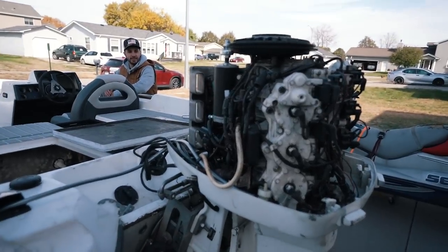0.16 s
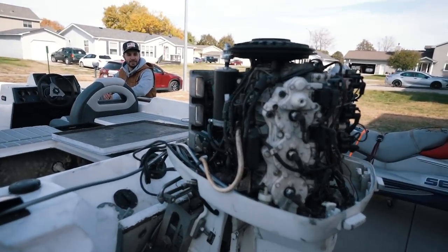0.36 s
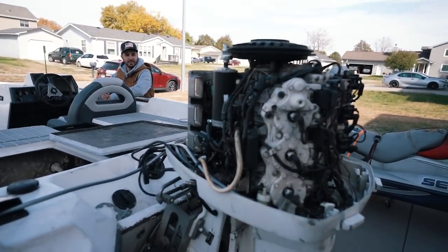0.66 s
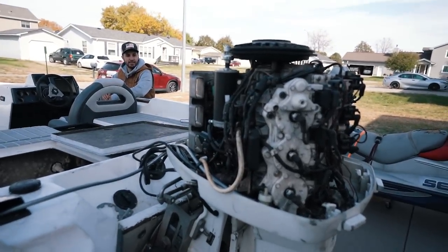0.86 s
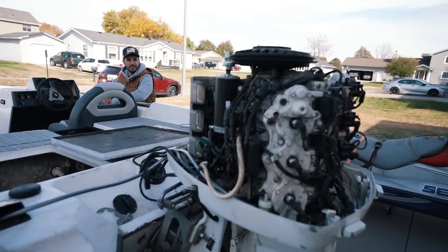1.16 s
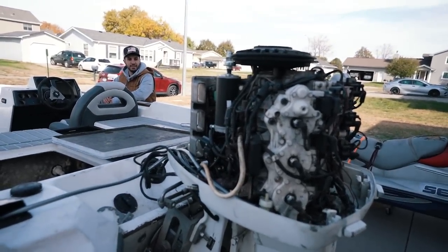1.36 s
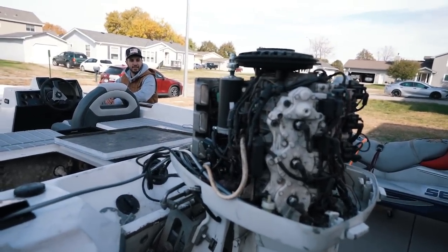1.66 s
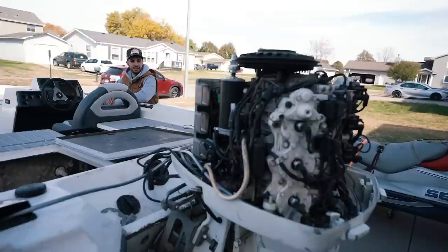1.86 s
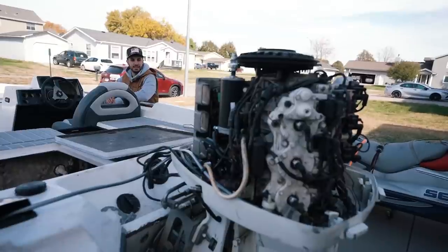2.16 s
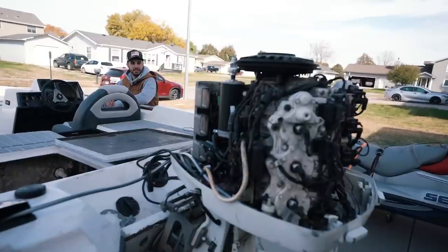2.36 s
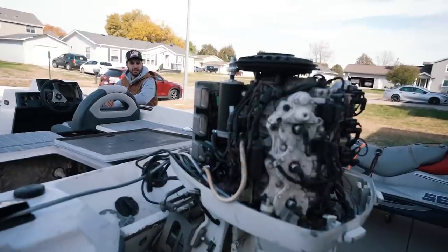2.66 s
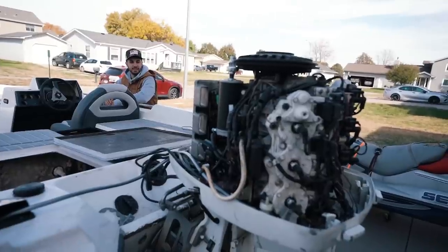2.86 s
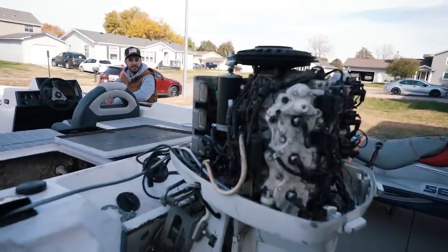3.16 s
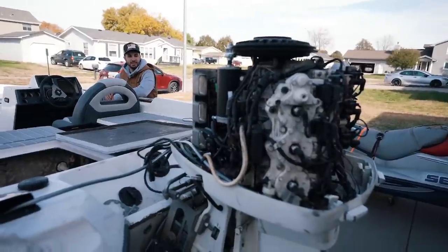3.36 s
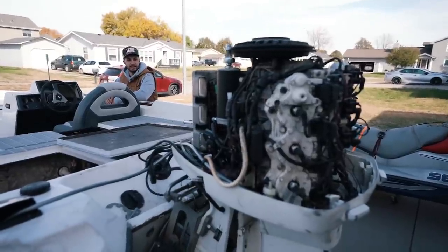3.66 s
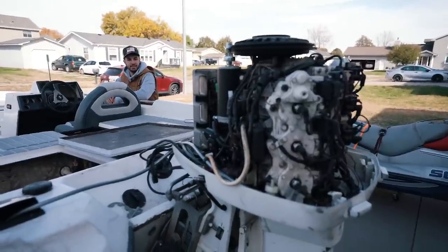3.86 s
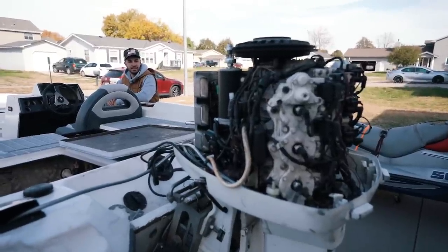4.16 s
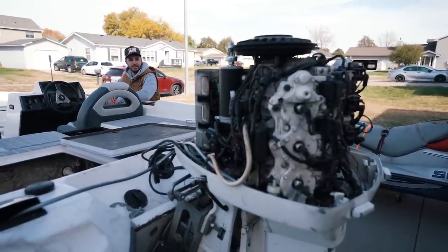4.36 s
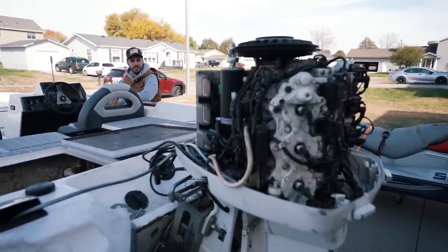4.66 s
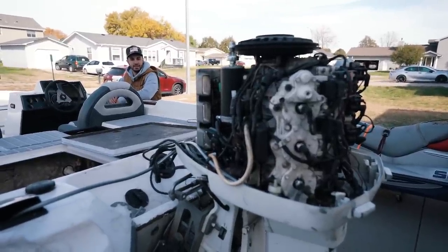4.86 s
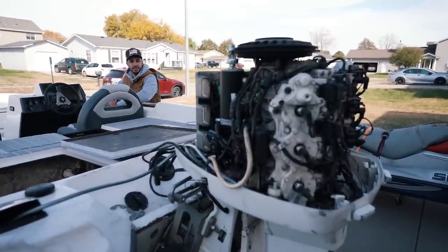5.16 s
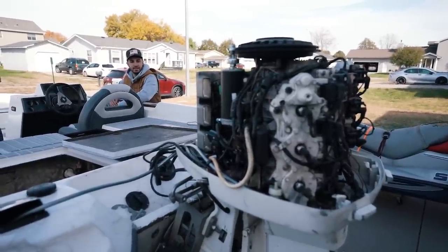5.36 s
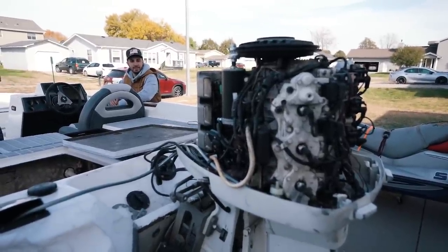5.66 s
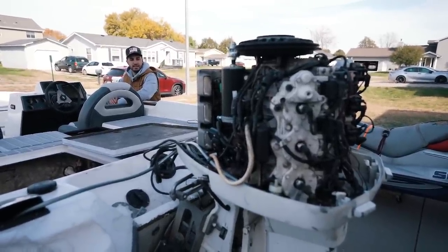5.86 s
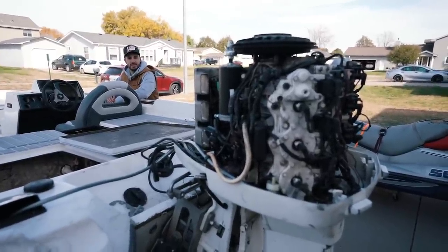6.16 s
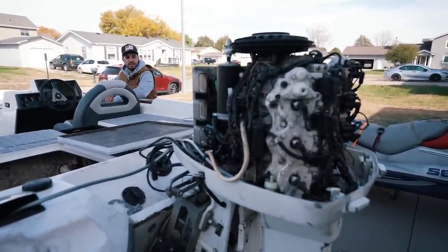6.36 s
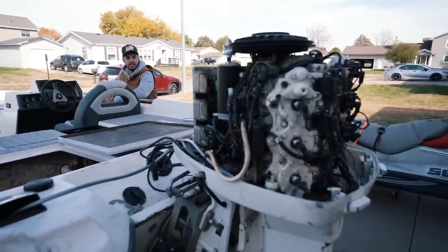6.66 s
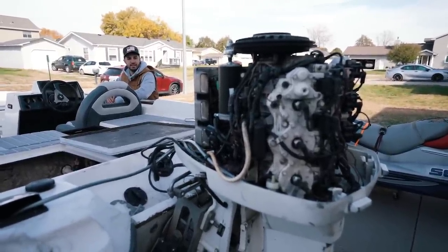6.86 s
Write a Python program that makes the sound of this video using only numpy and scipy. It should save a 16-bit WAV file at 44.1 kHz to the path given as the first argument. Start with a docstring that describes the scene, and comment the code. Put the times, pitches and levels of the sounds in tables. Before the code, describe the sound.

From the start, an electric starter cranks an uncovered two-stroke outboard engine, close by and outdoors. It quickly settles at about eight knocking compressions a second, with rattling gear teeth, a wavering whine, low booms, pulses of hiss and tiny, very high squeaks. The metal rings slightly and the open boat adds short reflections. At about 3.6 seconds the starter drops out with two clacks, and the engine coasts to rest by 4 seconds with a faint chirp. The much quieter pause holds a light patter of drops and a little low wind, with a dull bump on a hull panel at 4.6 seconds and a fainter one near 5.6. Right afterwards the starter engages with a loud metallic clack and a grind of gears. The rhythmic cranking is back by 6 seconds and continues to the end at about 7 seconds. The engine never catches.

```python
"""A starter cranks an uncowled three-cylinder two-stroke outboard in two runs; it never catches.
Ring-gear teeth rattle through the block over the starter's whine and the booms of the crankcases.
At each compression the gears slow, air hisses past the rings and the slack knocks over, ringing the
flywheel. Solenoid and pinion clack out and back in, and the open hull adds short reflections.
The pause holds a bump on a hull panel and a fainter one, a light patter of drops and a little wind."""
import sys
import numpy as np
from scipy import signal
from scipy.fft import rfft, irfft
from scipy.io import wavfile
from scipy.ndimage import uniform_filter1d

SR = 44100
rng = np.random.default_rng(int(sys.argv[2]) if len(sys.argv) > 2 else 0)


def transcribe(u):
    """Save the signal u as a 16-bit wav file named by the first command-line argument.

    u: samples, shape (n,) or (channels, n), limited to [-1, 1]; the rate is SR.
    q: integer samples, one column per channel.
    """
    v = np.clip(np.atleast_2d(u).T, -1, 1)
    q = np.round(v * 32767).astype(np.int16)
    wavfile.write(sys.argv[1], SR, q)


N = 309141
TIME = np.arange(N) / SR
BINS = np.fft.rfftfreq(16384, 1 / SR)
CYLINDERS, FULL_PACE = 3, 8  # full pace in compressions per second
KNOCK_DB, KNOCK_LAW = -11, .9  # knocks grow with the starter's effort to this power


def amp(db):
    """Decibels to gain."""
    return 10 ** (np.asarray(db) / 20)

def unit(x):
    """Scales to rms 1."""
    return x / np.sqrt(np.mean(x ** 2) + 1e-20)

def sine(hz):
    """A sine that follows a pitch curve."""
    return np.sin(2 * np.pi * np.cumsum(hz) / SR)

def follow(rows, at):
    """Each column of a table, joined by straight lines."""
    x, *columns = np.transpose(rows)
    return [np.interp(at, x, c) for c in columns]

def over_hz(points, hz=BINS):
    """A curve joined on a log-frequency axis."""
    f, value = np.transpose(points)
    return np.interp(np.log(hz + 1), np.log(f), value)

def eq(points):
    """Gain of an EQ curve drawn in Hz and dB."""
    return amp(over_hz(points))

def modes(rows):
    """Gain of overlapping resonances."""
    return np.sqrt(sum((amp(db) / (1 + ((BINS - hz) / width) ** 2)) ** 2 for hz, width, db in rows))

def colour(x, gain):
    """Causal filter of this shape that keeps the power of white noise."""
    log_gain = np.log(np.maximum(unit(gain), 1e-5))
    mirrored = np.r_[log_gain, log_gain[-2:0:-1]]
    response = np.fft.ifft(np.exp(np.conj(signal.hilbert(mirrored)))).real
    return signal.oaconvolve(x, response[:len(response) // 4])[:len(x)]

def tilted(x, bright_db, pivot_hz=1900):
    """Raises the treble and lowers the bass by so many dB."""
    low = signal.lfilter(*signal.butter(1, pivot_hz, fs=SR), x)
    return amp(-bright_db) * low + amp(bright_db) * (x - low)

def resonate(x, hz, width):
    """One mode that keeps the power of white noise."""
    r = np.exp(-np.pi * width / SR)
    return signal.lfilter([np.sqrt(2 * (1 - r * r))], [1, -r * np.exp(2j * np.pi * hz / SR)], x).real

def grains(count, per_s, spread_db):
    """Random tiny impacts of uneven size, rms 1."""
    size = amp(spread_db * np.minimum(rng.exponential(1, count), 4)) * rng.choice([-1, 1], count)
    return unit(size * (rng.random(count) < per_s / SR))

def wander(seconds):
    """Smooth random drift over about this time, rms 1."""
    hz = np.fft.rfftfreq(N, 1 / SR)
    return unit(irfft(rfft(rng.standard_normal(N)) * np.exp(-(hz * seconds) ** 2), N))

def swell(place, centre, length):
    """A smooth hump once in every cycle."""
    return np.exp(-.5 * (((place - centre + .5) % 1 - .5) / length) ** 2)

def swing(place, peak):
    """One wave per cycle, highest at the peak."""
    return np.cos(2 * np.pi * (place - peak))

def add(mix, s, sound):
    """Mixes a sound in at a time."""
    part = mix[max(round(s * SR), 0):][:len(sound)]
    part += sound[:len(part)]


# Tone of the outdoor air. Each row: frequency in Hz, relative level in dB.
AIR_EQ = [(18, -29), (30, 3), (145, 0.5), (165, -1.5), (280, -3.5), (328, -7.5), (499, -7), (569, -14),
          (760, -11), (1220, -18), (3870, -14.5), (11100, -24), (16000, -39)]
# Fader moves of the bed. Each row: time in seconds, wind level in dB, patter level in dB.
BED_FADERS = [(0, -61, -48), (4.2, -60, -43.5), (4.55, -47, -44.5), (4.75, -39.5, -41), (4.95, -40.5, -39),
              (5.27, -35.5, -43), (5.36, -49, -38), (7.01, -41, -48)]

def yard(air_db=-46, drops_per_s=220, splash_s=0.0041):
    """The bed: outdoor hush, a fine patter like water on concrete, and a low rumble of wind."""
    wind_db, patter_db = follow(BED_FADERS, TIME)
    hush = amp(air_db) * colour(rng.standard_normal(N), eq(AIR_EQ))
    splashes = signal.lfilter([1], [1, -np.exp(-1 / (splash_s * SR))], grains(N, drops_per_s, 3.6) ** 2)
    drops = unit(np.sqrt(splashes) * rng.standard_normal(N))
    patter = colour(drops, eq([(400, -6.5), (1400, -7), (2000, -3), (2700, 1), (4500, 3.5),
                               (7000, -2), (11000, -8), (16000, -18)]))
    wind = colour(rng.standard_normal(N), eq([(15, -14), (40, -4), (70, -1), (130, -21.5), (1500, -46)]))
    return hush + amp(patter_db) * patter + amp(wind_db) * wind

def hum(hz=497, width=7, db=-59):
    """A faint wavering hum hangs in the yard."""
    band = resonate(rng.standard_normal(N), hz, width)
    return amp(db) * unit(resonate(band, hz, 2 * width))

def drips(count=170, softest_db=-41, range_db=10.5, lowest_hz=1700, decay=.0012):
    """Larger drops land with very short pitched ticks, spread over two octaves."""
    out, t = np.zeros(N), TIME[:1024]
    for when, pitch, size in rng.random((count, 3)):
        ping = np.exp(-t / decay) * np.sin(2 * np.pi * lowest_hz * 4 ** pitch * t)
        add(out, when * N / SR, amp(softest_db + range_db * size) * ping)
    return out

# Resonances of a hull panel. Each row: frequency in Hz, width in Hz, relative level in dB.
PANEL_MODES = [(510, 35, 6), (400, 180, -8), (1120, 670, -8.5), (2200, 3000, -10)]
# Bumps on the panel. Each row: start in seconds, level in dB.
BUMPS = [(4.582, -22), (5.575, -32.5)]

def clunks(decay=0.02):
    """A hull panel is bumped in the pause and answers with a dull clunk."""
    out, t = np.zeros(N), TIME[:8192]
    for s, db in BUMPS:
        add(out, s, amp(db) * np.exp(-t / decay) * grains(len(t), 4000, 0.78))
    return colour(out, modes(PANEL_MODES))

# Ring-out of the open hull. Each row: frequency in Hz, seconds to fall by 60 dB.
HULL_DECAY = [(100, 0.27), (350, 0.17), (800, 0.092), (1200, 0.32), (2000, 0.06), (4000, 0.024),
              (9000, 0.058)]

def hull(x, tails=3, rock_hz=1.677):
    """Short reflections in the open boat, crossfading as the engine rocks on its mount."""
    out = np.zeros(N)
    for k in range(tails):
        echoes = grains(SR // 3, 2500, 1) * (TIME[:SR // 3] > .004)
        hz, t, spectrum = signal.stft(echoes, SR, nperseg=256)
        fade = amp(-60 * t[None] / over_hz(HULL_DECAY, hz)[:, None])
        tail = signal.istft(spectrum * fade, SR, nperseg=256)[1]
        weight = np.sqrt(2 / tails) * np.cos(np.pi * (rock_hz * TIME + k / tails))
        out += signal.oaconvolve(x * weight, tail / np.linalg.norm(tail))[:N]
    return out

def chirp(start=3.892, length=0.039, hz=2920, arch=0.051, db=-34):
    """One faint arched chirp as the starter coasts to rest."""
    out = np.zeros(N)
    bow = np.sin(np.pi * np.arange(0, 1, 1 / (length * SR)))
    add(out, start, amp(db) * bow * sine(hz * (1 + arch * bow)))
    return out

# The squeak builds after each start. Each row: time in seconds, level in dB.
SQUEAK_FADER = [(0, -50), (.65, -36), (.98, -9), (1.7, -18), (2.25, -7.5), (3.6, -15), (5.98, -45),
                (6.13, -10.5), (7, -15)]

def squeaks(strokes, hz=13650, scatter_hz=200, vary_db=2, width_s=0.00075, glide=0.0049, waver=.02):
    """A very high, short squeak falls in pitch at the peak of compression."""
    out, t = np.zeros(N), TIME[:1024] - TIME[512]
    envelope = np.exp(-.5 * (t / width_s) ** 2)
    for s, _ in strokes:
        size, detune = rng.uniform(-1, 1, 2) * np.sqrt(3)
        db = follow(SQUEAK_FADER, s)[0] + vary_db * size
        flutter = unit(uniform_filter1d(rng.standard_normal(len(t)), 24))
        pitch = (hz + scatter_hz * detune) * (1 - glide * t / width_s + waver * flutter)
        add(out, s + t[0] + 0.0012, amp(db) * envelope * sine(pitch))
    return out

# Ring of the starter's small steel parts. Each row: frequency in Hz, width in Hz, relative level in dB.
STEEL_MODES = [(600, 130, -31), (3000, 410, 6.5), (3550, 340, 8.5), (6000, 3500, 5), (8900, 300, -1),
               (10600, 2200, 2.5)]
# Loose parts. Each row: offset from the compression in seconds, level in dB.
LOOSE_PARTS = [(-.029, -23.5), (-.013, -36), (.045, -29.5)]

def ticks(strokes, vary_db=4, scatter_s=0.0025, decay=0.0019):
    """Loose parts tick around every compression, never quite alike."""
    out, t = np.zeros(N), TIME[:1024]
    for s, _ in strokes:
        for lag, db in LOOSE_PARTS:
            late, size = rng.uniform(-1, 1, 2)
            tick = np.exp(-t / decay) * grains(len(t), 8100, 0.67)
            add(out, s + lag + scatter_s * late, amp(db + vary_db * size) * tick)
    return colour(out, modes(STEEL_MODES))

# Crankcase booms. Each row: centre and width as shares of a turn, pitch at full pace in Hz, level in dB.
BOOMS = [(.07, 0.047, 89.1, -25.5), (.09, 0.055, 176, -28.5), (.19, 0.07, 63.9, -28.5),
         (.44, 0.062, 100.6, -29), (.46, 0.08, 192.2, -31), (.5, 0.055, 51.2, -36.5), (.58, .06, 75.8, -27),
         (.79, 0.1, 92.1, -27), (.81, 0.067, 177, -25.5), (.88, 0.088, 52.8, -33)]

def crankcases(pace, turn, waver_hz=6, unrest=0.58):
    """The pumping crankcases boom in the same order in every turn; their pitch bends with the pace."""
    out = np.zeros(N)
    for centre, length, hz, db in BOOMS:
        pitch = hz * pace + waver_hz * wander(0.0113)
        envelope = swell(turn, centre, length) * (1 + unrest * wander(0.013))
        out += np.sqrt(2) * amp(db) * envelope * sine(pitch)
    return out

def whine(pace, turn, hz=333, bend=0.0697, highest_at=.77, db=-32, swing_db=2.5, unrest=0.29):
    """The starter's whine sinks and climbs once per turn of the crank, loudest when highest."""
    wave = swing(turn, highest_at)
    pitch = hz * pace * (1 + bend * wave)
    roughness = 1 + unrest * wander(0.0019)
    return np.sqrt(2) * amp(db + swing_db * wave) * roughness * sine(pitch)

# Tone of the escaping air. Each row: frequency in Hz, relative level in dB.
LEAK_EQ = [(300, -11), (1200, 14.5), (1900, 17), (2600, -11), (4500, 2), (6800, 4.5), (7600, -1.5),
           (11000, -1.5), (13000, -15), (16000, -13)]

def leak(travel, airflow, db=-22.5):
    """Air fizzes past the piston rings, swelling just before each top centre."""
    fizz = colour(grains(N, 9000, 3.5), eq(LEAK_EQ))
    return amp(db) * swell(travel, centre=0.89, length=0.17) * airflow * fizz

# Solenoid and pinion hits. Each row: start in seconds, level in dB, decay in seconds,
# share of the power sent to the block, brightness in dB.
STARTER_HITS = [(3.601, -12.5, 0.0056, 0.077, 11), (3.742, -10.5, 0.0045, 0.046, -6),
                (5.6364, -8, 0.0021, 0.023, -2), (5.6578, -13.5, 0.0057, 0.06, -4),
                (5.6628, -3, 0.0037, 0.82, 5), (5.6675, -5.5, 0.01, 1, 0), (5.909, -31, 0.0029, .1, -2)]

def clacks():
    """The solenoid snaps and the pinion flies in or out: gives the steel's ring and the block's jolts."""
    steel, jolts, t = np.zeros(N), np.zeros(N), TIME[:8192]
    for s, db, decay, share, bright_db in STARTER_HITS:
        burst = amp(db) * np.exp(-t / decay) * unit(tilted(rng.standard_normal(len(t)), bright_db))
        add(steel, s, np.sqrt(1 - share) * burst)
        add(jolts, s, np.sqrt(share) * burst)
    return colour(steel, modes(STEEL_MODES)), jolts

# The flywheel's long notes. Each row: frequency in Hz, width in Hz, relative level in dB.
FLYWHEEL_MODES = [(1646, 5.9, 0), (4065, 21, -5), (759.3, 18, 2.5)]

def flywheel(mesh, blows, pumping):
    """The flywheel is rung by the blows, and by the teeth while driven against compression."""
    force = .6 * pumping * mesh + blows
    return amp(-13) * sum(amp(db) * resonate(force, hz, width) for hz, width, db in FLYWHEEL_MODES)

# Resonances of block and pan. Each row: frequency in Hz, width in Hz, relative level in dB.
BLOCK_MODES = [(262, 175, -14.5), (339, 45, -5), (408, 34, -9), (498, 71, -10), (564, 81, -12),
               (663, 36, -6), (774, 88, -3.5), (869, 88, -4.5), (1048, 28, -4.5), (1134, 41, -6),
               (1224, 68, -7.5), (1210, 99, -11.5), (1642, 77, -7), (1700, 37.0, -32), (1815, 194, -10.5),
               (2012, 144, -11.5), (2263, 89, -19.5), (2477, 21, -18), (2640, 103, -21), (3035, 250, -18.5),
               (3588, 177, -14), (3970, 65, -14.5), (4110, 69, -13), (4850.0, 420, -25.5),
               (6720, 210, -22.5), (8600, 260, -25.5), (10500, 7000, -30.5)]
# Tone of the teeth and of the blows. Each row: frequency in Hz, relative level in dB.
GEAR_EQ = [(100, -9), (200, 7.5), (330, -2), (500, 3.5), (800, 1), (1150, 0), (1800, 2.5), (3500, 0.5),
           (5000, 0), (9000, -10.5), (15000, -14.5)]
KNOCK_EQ = [(100, -27.5), (200, -5), (300, -4.5), (450, -3), (800, -2.5), (1200, 2.5), (1800, 0),
            (3500, 1.5), (5000, 1.5), (9000, 2.5), (15000, -3)]

def block(mesh, blows):
    """Block and pan give the tooth rattle and the blows their metal body."""
    body = modes(BLOCK_MODES)
    return colour(mesh, body * eq(GEAR_EQ)) + colour(blows, body * eq(KNOCK_EQ))

# Bounces of the slack. Each row: delay after the compression in seconds, trim on the knock level in dB.
BOUNCES = [(.027, -5), (.049, -7)]

def rebounds(strokes, vary_db=5, scatter_s=.005, decay=0.00097):
    """After each knock the gear flanks meet again, briefly and a little differently each time."""
    out, t = np.zeros(N), TIME[:1024]
    for s, effort in strokes:
        for lag, db in BOUNCES:
            late, size = rng.uniform(-1, 1, 2)
            blow = tilted(np.exp(-t / decay) * grains(len(t), 8000, 1), bright_db=-8)
            level = amp(KNOCK_DB + db + vary_db * size) * effort ** KNOCK_LAW
            add(out, s + lag + scatter_s * late, level * blow)
    return out

def knocks(strokes, rise=0.0023, hold=0.013, decay=0.0074, clash_decay=0.0038, lead_s=.002):
    """Past top centre the piston runs ahead: the gear flanks clash, then the full weight chatters in."""
    out, t = np.zeros(N), TIME[:4096]
    weight = (1 - np.exp(-t / rise)) * np.exp(-np.maximum(t - hold, 0) / decay)
    contact = amp(-4) * np.exp(-t / clash_decay)
    dull = signal.butter(2, 4600, fs=SR)  # heavy parts meet too slowly to make treble
    for s, effort in strokes:
        bright_db = -1.83 + 2 * rng.uniform(-1, 1)
        chatter = weight * grains(len(t), 2500, 3)
        thump = tilted(signal.lfilter(*dull, chatter), bright_db)
        clash = tilted(contact * grains(len(t), 8000, 0.33), bright_db=5)
        add(out, s - lead_s, amp(KNOCK_DB) * effort ** KNOCK_LAW * (thump + clash))
    return out

# The gears strain or go slack as the starter takes hold and lets go.
# Each row: centre in seconds, width in seconds, boost or cut in dB.
GEAR_STRAINS = [(0.03, 0.018, -5.5), (0.1, 0.034, 5), (0.397, .15, 1), (3.576, 0.0088, -3.5),
                (3.639, 0.013, -18), (3.675, 0.015, 9.5), (3.74, .018, 6), (3.797, .018, -3),
                (5.674, 0.036, 12.5), (5.82, 0.047, 13), (5.886, .02, -9.5)]

def starter_effort(pace, law=1.58):
    """Gear noise grows with speed and strain; about 1 in steady cranking."""
    strain_db = sum(db * np.exp(-.5 * ((TIME - s) / width) ** 2) for s, width, db in GEAR_STRAINS)
    return pace ** law * amp(strain_db)

# The crank spins up, holds, coasts to rest and restarts. Each row: time in seconds, compressions a second.
CRANK_RATE = [(0, 4.727), (0.32, 7.717), (0.6, 7.877), (0.85, 7.954), (1.7, 7.757), (2.2, 7.948),
              (3.6, 7.965), (3.75, 5.4), (3.97, 2.7), (4.03, 0), (5.655, 0), (5.68, 6.1), (5.84, 5.6),
              (5.96, 7.538), (6.35, 8.075), (7.01, 8.097)]
# The two runs. Each row: start and end of pumping and first compression in seconds, its cylinder (0-2).
CRANK_RUNS = [(0, 3.645, .143, 2), (5.87, 7.02, 5.997, 1)]

def crank():
    """Pace (1 = full), travel in compressions, a pumping gate and the sample of each top centre."""
    rate, = follow(CRANK_RATE, TIME)
    passed = np.cumsum(rate) / SR
    travel, pumping = np.zeros(N), np.zeros(N)
    for start, stop, first, cylinder in CRANK_RUNS:
        travel = np.where(TIME >= start, passed - np.interp(first, TIME, passed) + cylinder, travel)
        pumping[(TIME > start) & (TIME < stop)] = 1
    tops = np.flatnonzero((np.diff(np.floor(travel)) > 0) & (pumping[:-1] > 0))
    return rate / FULL_PACE, travel, uniform_filter1d(pumping, 400), tops

def gears(pace, travel, pumping, effort, db=-21.5, full_tooth_hz=340, sag=.1, clump_db=3.5):
    """Each ring-gear tooth strikes the pinion and scrapes across it; every compression slows them."""
    tooth_hz = full_tooth_hz * pace * (1 - sag * pumping * swing(travel, peak=-.05))
    teeth = np.cumsum(tooth_hz) / SR
    strikes = np.diff(np.floor(teeth), prepend=0) * (1 + 0.32 * rng.standard_normal(N))
    scrape = grains(N, 7000, 2.36) * (0.53 + np.exp(-(teeth % 1) / 0.16))
    force = amp(-11) * unit(strikes - strikes.mean()) + 0.86 * unit(scrape)
    # slow teeth meet softly and lose their treble; fast ones chatter in clumps
    soft = signal.sosfiltfilt(signal.butter(2, 1400, fs=SR, output="sos"), force)
    hardness = np.minimum(tooth_hz / 270, 1) ** 3 * amp(clump_db * wander(0.016) - 1)
    load_db = 1.5 * pumping * (1 + swing(travel, peak=0.23))
    return amp(db + load_db) * effort * (soft + hardness * (force - soft))

def scene():
    """The crank's cycle times the engine's layers, which play over the yard in mono."""
    pace, travel, pumping, tops = crank()
    turn = travel / CYLINDERS
    effort = starter_effort(pace)
    strokes = list(zip(TIME[tops], effort[tops]))
    airflow = np.minimum(amp(-3.5) * effort, 1) * pace ** 0.62
    mesh = gears(pace, travel, pumping, effort)
    steel, jolts = clacks()
    blows = jolts + knocks(strokes) + rebounds(strokes)
    hiss = leak(travel, airflow * pumping)
    # the low growl drops once the pistons stop pumping
    growl = airflow * (.5 + .5 * pumping) * (crankcases(pace, turn) + whine(pace, turn))
    engine = block(mesh, blows) + hiss + ticks(strokes) + clunks()
    reflections = amp(-15.5) * hull(engine)
    details = flywheel(mesh, blows, pumping) + steel + squeaks(strokes) + chirp()
    return (engine + reflections + growl + details + hum() + yard() + drips())[None]

def record(dry, ceiling=0.96, cutoff_hz=15950):
    """A soft clip rounds the loudest peaks; a steep low-pass trims the very top."""
    rounded = dry / (1 + (dry / ceiling) ** 4) ** (1 / 4)
    lowpass = signal.firwin(255, cutoff_hz, window=("kaiser", 9), fs=SR)
    return signal.oaconvolve(rounded, lowpass[None], "same")

dry = scene()
out = record(dry)
transcribe(out)
```